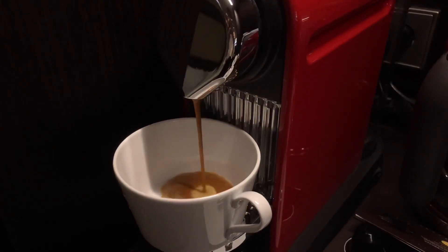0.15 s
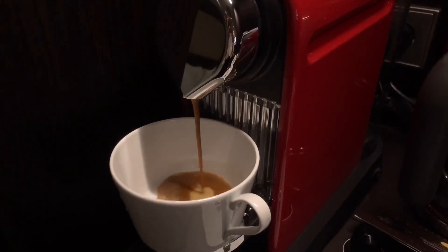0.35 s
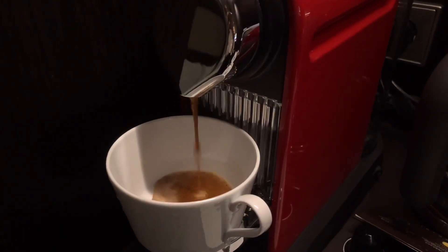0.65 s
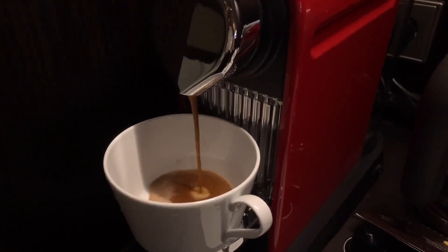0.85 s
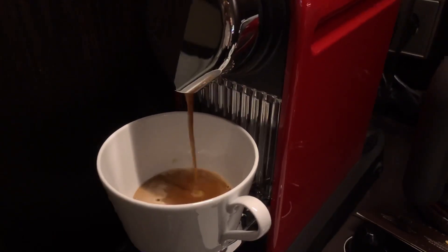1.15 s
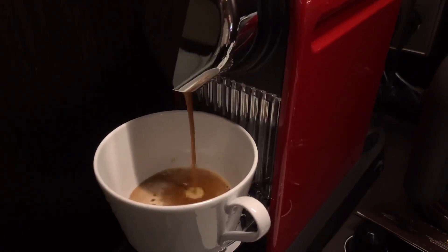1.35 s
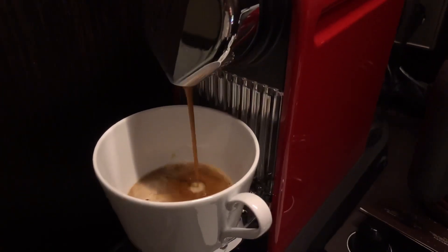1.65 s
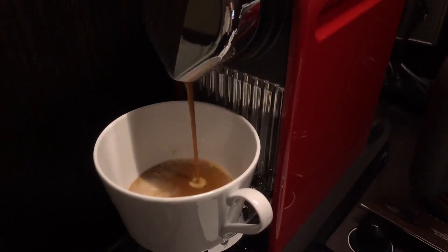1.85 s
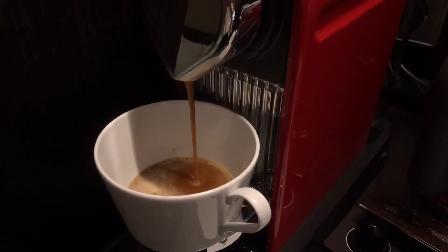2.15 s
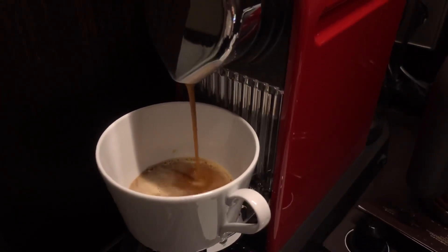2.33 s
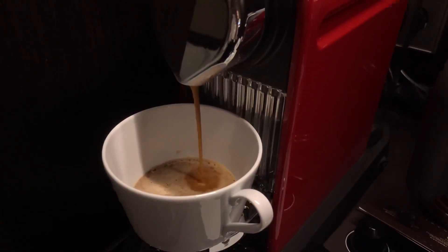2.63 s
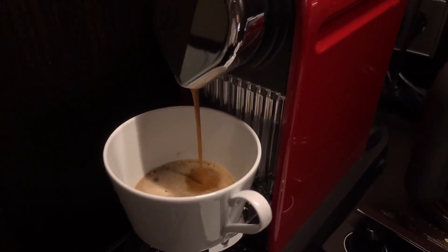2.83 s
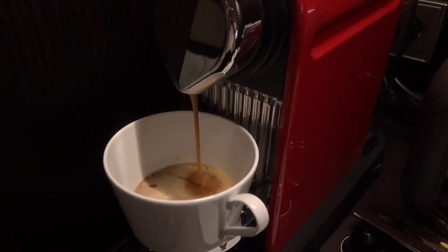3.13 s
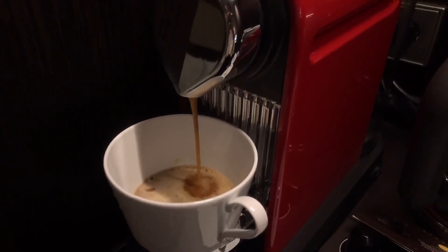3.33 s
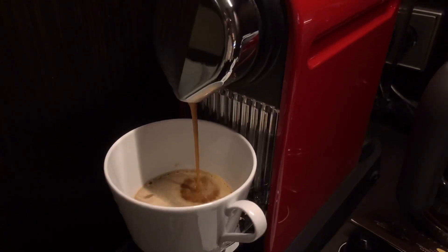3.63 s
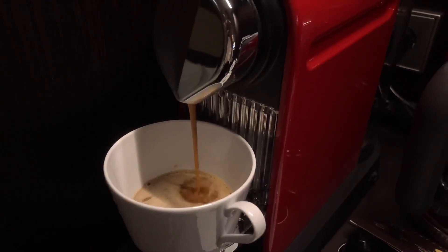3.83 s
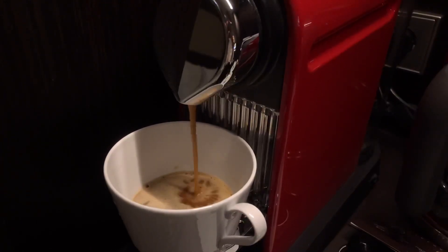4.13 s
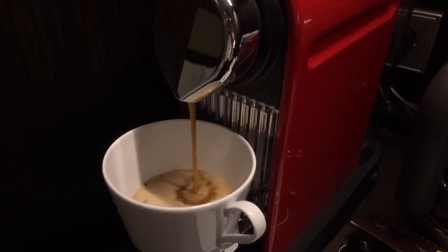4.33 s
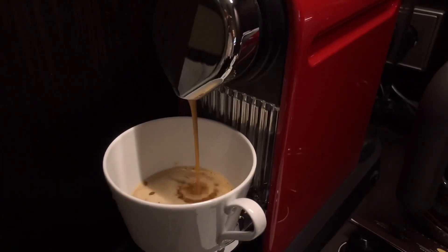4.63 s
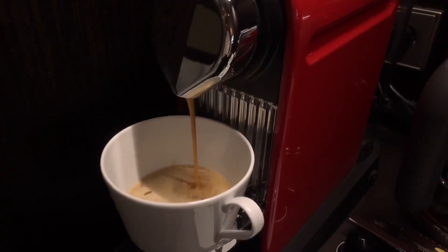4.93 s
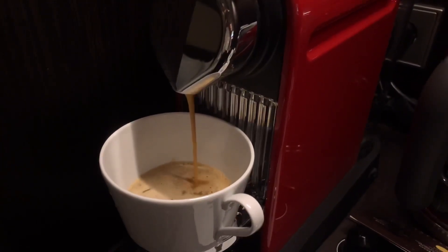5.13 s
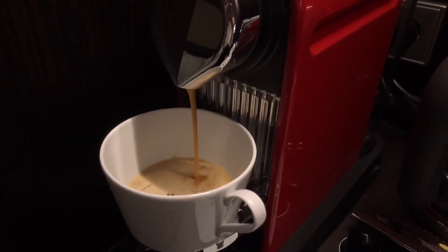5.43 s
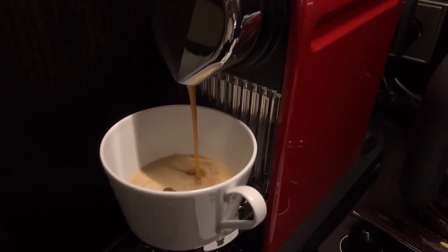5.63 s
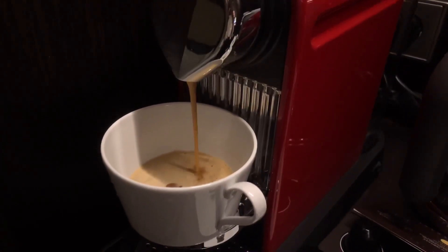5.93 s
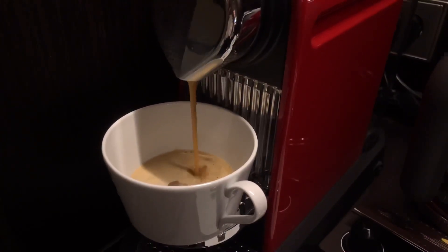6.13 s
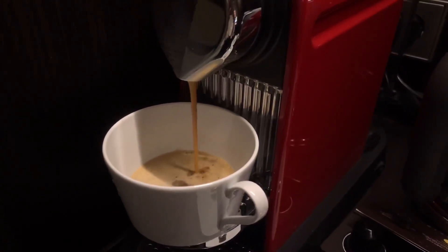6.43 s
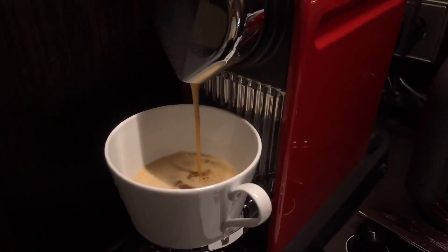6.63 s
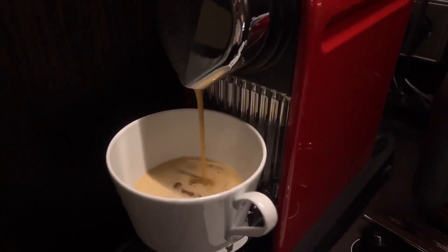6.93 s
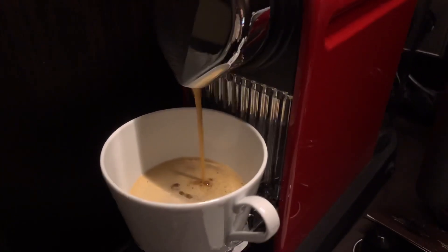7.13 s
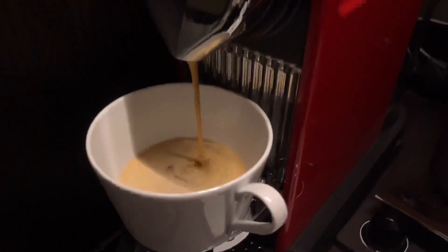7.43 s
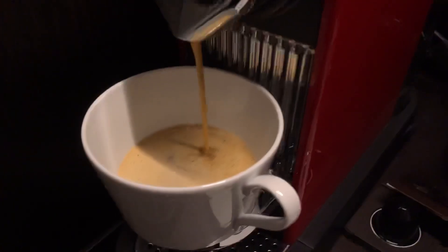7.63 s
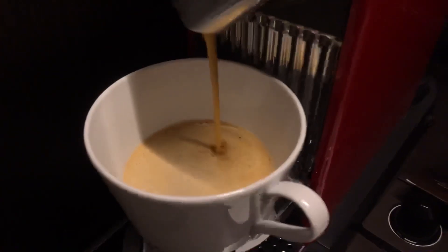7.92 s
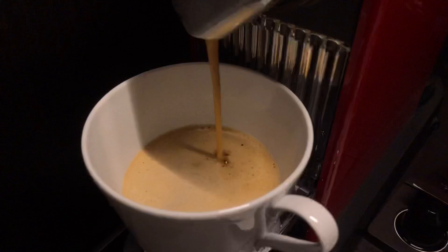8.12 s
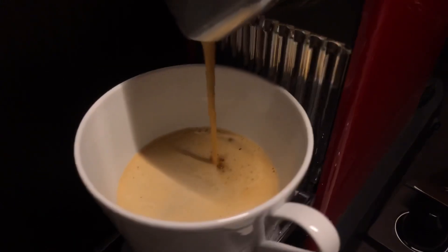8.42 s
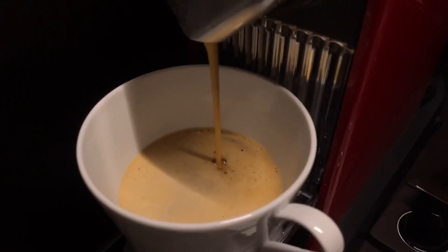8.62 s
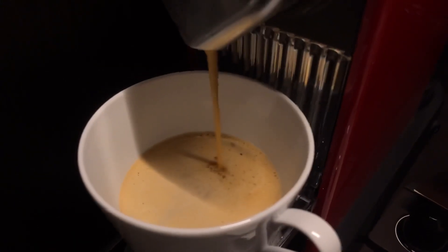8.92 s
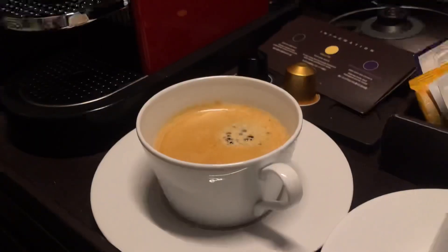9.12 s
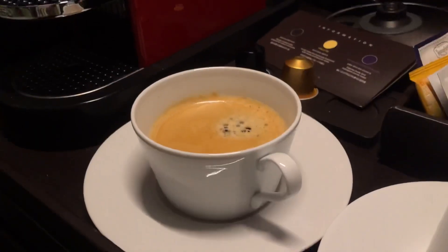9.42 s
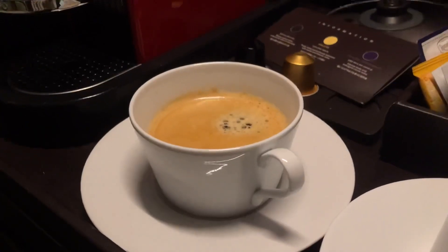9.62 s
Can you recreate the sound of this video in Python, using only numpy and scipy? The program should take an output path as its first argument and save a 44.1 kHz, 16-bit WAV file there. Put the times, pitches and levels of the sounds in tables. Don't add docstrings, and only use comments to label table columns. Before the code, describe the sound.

Indoors and close up, a vibrating pump drones continuously with a coarse buzz, churning water and a thin, high squeak and rattle on each rapid stroke. Small knocks and wet plops appear sparsely over it. The buzz changes colour as the microphone drifts around, growing brighter when it leans in, then everything stops abruptly, leaving soft room hum and a brief low rumble.

```python
import sys
import numpy as np
from scipy import signal
from scipy.fft import rfft, irfft, next_fast_len
from scipy.io import wavfile
from scipy.ndimage import uniform_filter1d

SR = 44100
rng = np.random.default_rng(int(sys.argv[2]) if len(sys.argv) > 2 else 0)


def invert_db(level):
    return 10 ** (np.asarray(level, dtype=float) / 20)


def master(y):
    cut = np.clip(np.atleast_2d(y).T, -1, 1)
    pcm = np.round(cut * 32767)
    wavfile.write(sys.argv[1], SR, pcm.astype(np.int16))


N = 430840

STROKE_HZ = 60.018
SCENE_CHANGE_S, SLIP_S, LOOSE_UNTIL_S = 9.0895, 4.455, 1.63
LEAN_FROM_S, LEAN_TAKES_S = 7, 1

# time in seconds, microphone turn from front 0 to side 1,
# nearness to the counter in dB, unevenness of strokes in dB.
HAND_PATH = [(0, 0.38, 5, 11), (.12, .03, 4, 2), (.5, 0.15, 3.5, 0), (1.9, 0.29, 1, -13),
             (2.7, 0.38, .5, -5), (3.1, 0.39, 0, -24), (3.9, 0.45, -1, -22), (4.4, 0.59, -1, -7.5),
             (5.9, 0.92, -1, -1.5), (7.1, 0.9, -0.5, -0.5), (8.0, 0.67, 0, 4), (9.08, 0.5, .5, 4)]
# multiple of stroke rate, level in dB.
HALF_MULTIPLES = [(2.5, -39), (6.5, -22), (9.5, -31.5), (11.5, -18), (12.5, -26), (13.5, -14), (14.5, -11),
                  (15.5, -15.5), (16.5, -20), (17.5, -15.5), (20.5, -32.5), (23.5, -27.5), (40, -35.5)]
# rough multiple (not read),
# level in dB, gain by the full turn in dB, share of nearness.
OVERTONES = [(3, -66.5, 3.5, -0.9), (3.96, -71, 7, 0.1), (5.25, -53.5, -12, -2.0), (6, -51.5, -3.5, 4),
             (7, -66.0, 6, -1), (7.67, -44, -17, 2), (9.17, -45.5, -3, -0.53), (10, -61.5, 26, -0.5),
             (10.94, -53, 4.5, 4), (12.96, -44, -18.5, -0.8), (13, -64.5, 14.5, 2.3), (14, -49, -12, 0.2),
             (15, -61, 2.5, 2.5), (16, -43.5, -17, 0.5), (17.37, -55, -7, 1.5), (17.9, -58.5, -0.5, -0.3),
             (19.3, -66.5, 1.5, -0.5), (20, -67.5, 4.5, 2.5), (19.44, -65, -5.5, 0.7), (22, -67.5, 12.5, 0),
             (22.65, -62.5, -13.5, -3), (24, -85, -50, -5), (25, -62, -18, -3), (26, -69, -10, -2.5),
             (27, -68.5, 0.5, 1), (28, -74.5, -19, 1), (29, -62, -15.5, -3), (30.7, -66.5, -10, -1)]
# time in seconds, multiple of stroke
# rate, gain in dB, half width in seconds.
CROSSINGS = [(0.01, 8, -14, 1.5), (0.08, 6, -17.5, 1.57), (0.17, 13, 10, 0.2), (0.33, 16, -18, 1.7),
             (0.63, 11, -27, 0.83), (0.88, 19, 14.5, 0.97), (1.04, 7, 12.5, 1.9), (1.27, 9, -6, 2.2),
             (1.29, 27, 1.5, 0.6), (2.02, 12, -7, 0.35), (2.46, 4, -13.0, 0.43), (2.98, 18, -16, 0.54),
             (3.15, 13, 7.0, 1.1), (3.84, 7, -15, 0.47), (4.43, 11, -2, 1.35), (5.32, 23, -6, 0.53),
             (5.35, 20, 5.5, 2), (6.43, 15, -46, 0.73), (6.46, 10, -14.5, 1.8), (6.46, 22, -7, 0.97),
             (7.11, 16, -10, 0.8), (7.86, 14, 6.5, 0.61), (8.31, 28, 18, 2.2), (8.69, 20, 16, 0.32),
             (.15, 20, 9, .3), (.2, 21, 4, 0.28), (.8, 13, -4, 0.49), (3.3, 5, 2.5, 1),
                  (4.3, 22, 2.5, 1), (8.5, 4, 4.5, 1)]
# multiple of stroke rate, delay in ms.
PANEL_DELAYS = [(2, 9), (6, 10), (8, 6.5), (10.5, 4.5), (12, 1), (16, -1), (18, 4), (22, 9), (36, 3)]
# frequency in Hz, density in dB per Hz.
CHURN_SPECTRUM = [(18, -62), (30, -39), (122, -7), (145, -18.5), (221, -23), (358, -14), (431, -20),
                  (538, -9), (1310, -15), (1430, -19), (2500, -21.5), (3250, -70), (5500, -120)]
# time in seconds, gain in dB, half width in seconds.
VALVE_HESITATIONS = [
    (2, -3.5, 0.46),
    (.1, 3.5, .4),
]
# frequency in Hz, width in Hz, level in dB, gain by full turn in dB, by leaning in dB.
CASING_MODES = [(2780, 1430, -0.5, -2.5, -1.5), (3366, 253, -3, 3.5, 0.5), (3506, 2670, 0.5, -1, -1),
                (4540, 400, -37, -11, 0.1)]
# frequency in Hz, width in Hz, level in dB, gain by full turn in dB, by leaning in dB.
SPRING_MODES = [(6576, 610, 3.5, -0.5, 0.27), (7230, 300, -4, 6.5, 0.76), (7900, 2100, 5, -1.7, 0.73),
                (8420, 210, -2, -2, -1)]
# frequency in Hz, width in Hz, level in dB, gain by full turn in dB, by leaning in dB.
PLUNGER_MODES = [(9330, 240, -9.5, 0.1, -2), (9780, 230, -1, 0.1, 0.1), (10600, 660, -5, 0.1, 0.1),
                 (11700, 1100, -4.5, 0.1, 0.34)]
# frequency in Hz, width in Hz, level in dB, gain by full turn in dB, by leaning in dB.
SEAT_MODES = [(12270, 440, -4, 6, 3), (13020, 400, -3, 3, 5), (13600, 350, 2, -5, -3),
              (14300, 1400, -5, 2, 0.1), (15400, 800, -.5, -2, -4)]
# frequency in Hz, width in Hz, level in dB.
CLIP_MODES = [(8320, 620, 1), (9990, 460, 4), (10950, 160, -2), (11670, 1300, 2), (12200, 270, -27)]
# start in ms, decay in ms, level in dB.
CASING_BURSTS = [(.5, 1.5, -8), (3.2, 2.6, 0), (10.5, 2.5, -9)]
# start in ms, decay in ms, level in dB.
SPRING_BURSTS = [(.5, 5.5, 0), (11.2, 2.0, 1)]
# start in ms, decay in ms, level in dB.
PLUNGER_BURSTS = [(-1.2, 2.5, 2), (1.2, 3.2, 3), (11.5, 2, -8)]
# start in ms, decay in ms, level in dB.
SQUEAK_BURSTS = [(1.2, 2.0, -3), (2.3, 2.3, 7), (5.9, 2.2, -1), (11, 4, -14)]
# level in dB, gain by full turn in dB, share of nearness, gain by leaning in dB.
RATTLE_LEVELS = [
    (-57.5, -0.17, 0.71, 1.5),
    (-58, -0.54, 0.23, 2.3),
    (-60.5, 0.23, 0.12, 2.8),
    (-60.5, 0.36, .1, 3.7),
]
# start in seconds, peak in dB, frequency in Hz, t60 in seconds, crack in dB.
DROPS = [
    (.37, -38, 61, .1, -70),
    (.7952, -32, 2800, 0.013, -42),
    (1.282, -37, 3000, .012, -46),
    (1.329, -26.5, 168, 0.038, -70),
    (4.452, -37, 150, .04, -70),
    (4.858, -28.5, 1160, 0.034, -40),
    (4.858, -40.5, 1450, .035, -60),
    (5.319, -50, 3000, .01, -39),
    (5.619, -39, 2220, .012, -43),
    (7.743, -29.5, 1140, 0.028, -27),
]
# time in seconds, gain in dB.
RUMBLE_SWELLS = [
    (9.33, 6),
    (9.42, 9),
    (9.55, 6),
]
# frequency in Hz, density in dB per Hz.
KITCHEN_SPECTRUM = [(60, -36), (95, -21), (150, -16), (250, -15), (500, -27), (1000, -33.5), (2700, -41.5),
                    (11800, -47.5), (14300, -45), (15700, -48)]
# frequency in Hz, level in dB rms.
WHINES = [(13577, -115), (14535, -88), (14777, -85), (14896, -90), (15138, -99), (15256, -92), (15493, -98),
          (15617, -102)]


def seconds():
    return np.arange(N) / SR


def strokes():
    return seconds() * STROKE_HZ


def rms_one(x):
    return x / np.sqrt(np.mean(x ** 2) + 1e-20)


def in_time(rows):
    s, *columns = np.transpose(rows)
    return [np.interp(seconds(), s, column) for column in columns]


def at(x, rows):
    return np.interp(x, *np.transpose(rows))


def drift(rate_hz):
    r = np.exp(-128 * np.pi * rate_hz / SR)
    white = rng.standard_normal(N // 64 + 2002)
    slow = signal.lfilter([1], [1, -2 * r, r * r], white)[2000:]
    return np.interp(np.arange(N) / 64, np.arange(len(slow)), rms_one(slow - slow.mean()))


def bumps(rows):
    return sum(db * np.exp(-((seconds() - s) / width_s) ** 2) for s, db, width_s in rows)


def heard(db, turn_db, near_share, lean_db=0):
    turned, near_db, _ = in_time(HAND_PATH)
    lean = np.clip((seconds() - LEAN_FROM_S) / LEAN_TAKES_S, 0, 1)
    return db + turn_db * turned + near_share * near_db + lean_db * lean


def coloured(spectrum):
    hz, db = np.transpose(spectrum)
    size = next_fast_len(N)
    bin_hz = np.arange(size // 2 + 1) * SR / size
    shape = invert_db(np.interp(np.log(bin_hz + 1), np.log(hz), db, left=-90, right=-90))
    return rms_one(irfft(rfft(rng.standard_normal(size)) * shape, size)[:N])


def resonate(x, hz, width_hz):
    r = np.exp(-np.pi * width_hz / SR)
    poles = [1, -2 * r * np.cos(2 * np.pi * hz / SR), r * r]
    return signal.lfilter([(1 - r * r) / 2, 0, (r * r - 1) / 2], poles, x)


def bursts(table, uneven_db, rest_db, lag_ms=0):
    out = np.full(N, invert_db(rest_db))
    for start_ms, decay_ms, db in table:
        turn = strokes() - (start_ms + lag_ms) * STROKE_HZ / 1000 + 1
        index = turn.astype(int)
        luck = rng.standard_normal((index.max() + 1, 2))[index]
        late_ms = 0.12 * np.abs(luck[:, 1])
        age_ms = np.maximum((turn - index) * 1000 / STROKE_HZ - late_ms, 0)
        attack = np.minimum(age_ms / 0.55, 1)
        out += invert_db(db + uneven_db * luck[:, 0]) * attack * np.exp(-age_ms / decay_ms)
    return out


def repeated_noise(alike):
    patterns = rng.standard_normal((22, SR // 60 + 1))
    stage = np.arange(N) / N * 20
    place = (strokes() % 1 * SR / STROKE_HZ).astype(int)
    index, blend = stage.astype(int), stage % 1 * np.pi / 2
    same = np.cos(blend) * patterns[index, place] + np.sin(blend) * patterns[index + 1, place]
    share = np.clip(alike, 0, 1)
    return np.sqrt(share) * same + np.sqrt(1 - share) * rng.standard_normal(N)


def hum():
    stroke_db = heard(-52, turn_db=.5, near_share=0.2, lean_db=2) + .3 * drift(8)
    magnet_db = heard(-41.5, turn_db=0.2, near_share=1.13, lean_db=0) + .25 * drift(12)
    slip = np.clip((seconds() - SLIP_S) / 0.0098, 0, 1)
    turn = 2 * np.pi * strokes()
    stroke_tone = invert_db(stroke_db) * np.cos(turn - .7 - 1.1 * slip)
    magnet_tone = invert_db(magnet_db) * np.cos(2 * turn - 1.6 - .9 * slip)
    return np.sqrt(2) * (stroke_tone + magnet_tone)


def overtone_db(multiple):
    columns = np.transpose(OVERTONES)[1:]
    row_multiples = np.arange(len(OVERTONES)) + 3
    db = heard(*[np.interp(multiple, row_multiples, column) for column in columns]) + 1.28 * drift(1.6)
    crossed = [(s, gain_db, width_s) for s, k, gain_db, width_s in CROSSINGS
               if round(k) == multiple]
    return db + bumps(crossed)


def buzz():
    turn, out, late_rad = 2 * np.pi * strokes(), 0, 0
    uneven_db = in_time(HAND_PATH)[2]
    stumble_rad = 0.28 * drift(21) * invert_db(4.5 * drift(5.4))
    for multiple in np.arange(2.5, 36.2, .5):
        if multiple % 1:
            db = at(multiple, HALF_MULTIPLES) - 44.5 + uneven_db + 2.8 * drift(3.5)
        else:
            db = overtone_db(multiple)
        late_rad += np.pi * STROKE_HZ / 1000 * at(multiple, PANEL_DELAYS)
        scatter = rng.normal(0, .5 + 4 * (multiple % 1))
        panel = np.exp(-((multiple - 16.2) / 6.8) ** 2)
        waver = 0.017 * min(multiple, 18) * drift(20.0) + 0.36 * drift(0.3)
        phase = scatter - late_rad + stumble_rad * panel + waver
        out = out + invert_db(db) * np.cos(multiple * turn + phase)
    return np.sqrt(2) * out


def churn():
    level = invert_db(-56 + 1.6 * drift(0.58))
    return level * rms_one(coloured(CHURN_SPECTRUM) * bursts(CASING_BURSTS, uneven_db=1.5, rest_db=43))


def squeak():
    level_db = heard(-56, turn_db=3.5, near_share=0, lean_db=2) + .7 * drift(5.3) + bumps(VALVE_HESITATIONS)
    index = strokes().astype(int)
    hz = 5200 + 60 * rng.standard_normal(index.max() + 1)[index] + 90 * drift(147)
    hz = hz + 260 * np.clip(1 - (strokes() % 1 - .14) / .1, 0, 1) - 30
    lag_ms = 0.97 * np.minimum(seconds() / 1.9, 1)
    gate = bursts(SQUEAK_BURSTS, uneven_db=1.7, rest_db=-28, lag_ms=lag_ms)
    tone = np.sin(2 * np.pi * np.cumsum(hz) / SR)
    breath = rms_one(resonate(resonate(repeated_noise(0.067), 5210, 870), 5210, 870))
    chirp = resonate(gate * (tone + 0.55 * breath), 5250, 1500)
    seat_ring = resonate(gate * rng.standard_normal(N), 5563, 90)
    return invert_db(level_db) * (rms_one(resonate(chirp, 4930, 1250)) + invert_db(-14) * rms_one(seat_ring))


def rattle():
    out = 0
    parts = [(CASING_MODES, CASING_BURSTS, -8), (SPRING_MODES, SPRING_BURSTS, -12),
             (PLUNGER_MODES, PLUNGER_BURSTS, -15), (SEAT_MODES, PLUNGER_BURSTS, -14)]
    for levels, (modes, table, rest_db) in zip(RATTLE_LEVELS, parts):
        flicker = invert_db(0.41 * drift(350))
        grains = repeated_noise(0.32) * flicker * bursts(table, uneven_db=2.0, rest_db=rest_db)
        rings = 0
        for k, (hz, width_hz, db, turn_db, lean_db) in enumerate(modes):
            level = invert_db(heard(db, turn_db, 0, lean_db) + 1.06 * drift(0.74)) / np.sqrt(width_hz)
            ring = resonate(resonate(grains, hz, 2 * width_hz), hz, width_hz)
            rings = rings + (-1) ** k * level * ring
        out = out + invert_db(heard(*levels)) * rms_one(rings)
    return out


def loose_clip():
    settle = invert_db(-22 * np.clip((seconds() - LOOSE_UNTIL_S) / .03, 0, 1))
    grains = repeated_noise(0.39) * bursts(PLUNGER_BURSTS, uneven_db=1.0, rest_db=-43)
    rings = sum(invert_db(db) * resonate(resonate(grains, hz, width_hz), hz, width_hz)
                for hz, width_hz, db in CLIP_MODES)
    return invert_db(-56) * settle * rms_one(rings)


def drops():
    out = np.zeros(N)
    age_s = np.arange(SR // 5) / SR
    for s, db, hz, t60_s, crack_db in DROPS:
        rise_per_ms = 0.31 * min(hz / 2400, 1) ** 3.93
        turns = hz * (age_s + 500 * rise_per_ms * np.minimum(age_s, .01) ** 2)
        attack = np.minimum(age_s * hz / 1.3, 1)
        tone = invert_db(db - 60 * age_s / t60_s) * attack * np.sin(2 * np.pi * turns)
        snap = rng.standard_normal(len(age_s))
        snap[0] = 6
        splash = resonate(resonate(snap, 2400, 5000), 2400, 5500) + .04 * snap
        crack = invert_db(crack_db - 60 * age_s / 0.015) * splash
        out[round(s * SR):][:len(age_s)] += tone + crack
    return out


def rumble(hz, width_hz, level_db):
    band = resonate(resonate(rng.standard_normal(N), hz, width_hz), hz, width_hz)
    return invert_db(level_db) * band / np.sqrt(uniform_filter1d(band ** 2, size=SR // 14))


def kitchen(running):
    t = seconds()
    after_s = np.maximum(t - SCENE_CHANGE_S, 0)
    rumble_db = -57 - 6 * after_s + bumps([(s, db, 0.023) for s, db in RUMBLE_SWELLS])
    deep_db = -56.5 - 8.5 * np.clip((after_s - .1) / .17, 0, 1)
    lows = rumble(65, 30, rumble_db + 1) + rumble(43, 18, deep_db)
    hiss = invert_db(-64) * coloured(KITCHEN_SPECTRUM)
    fridge = invert_db(-58.5 + 1.8 * drift(6.8)) * np.cos(2 * np.pi * 120.2 * t)
    whine = sum(np.sqrt(2) * invert_db(db + 2.3 * drift(8)) * np.cos(2 * np.pi * (hz * t + rng.random()))
                for hz, db in WHINES)
    return (lows + hiss + fridge + whine) * (1 - running + running * invert_db(-16.5))


def scene():
    running = np.clip((SCENE_CHANGE_S - seconds()) / 0.0014, 0, 1)
    machine = hum() + buzz() + churn() + squeak() + rattle() + loose_clip() + drops()
    return (running * machine + kitchen(running))[None]


def top_cut(x):
    return signal.sosfilt(signal.butter(12, 15750, fs=SR, output="sos"), x)


def record(dry):
    low_pass = signal.ellip(10, .5, 60, 15880, fs=SR, output="sos")
    mix = signal.sosfilt(low_pass, dry)
    return top_cut(mix)


dry = scene()
out = record(dry)
master(out)
```